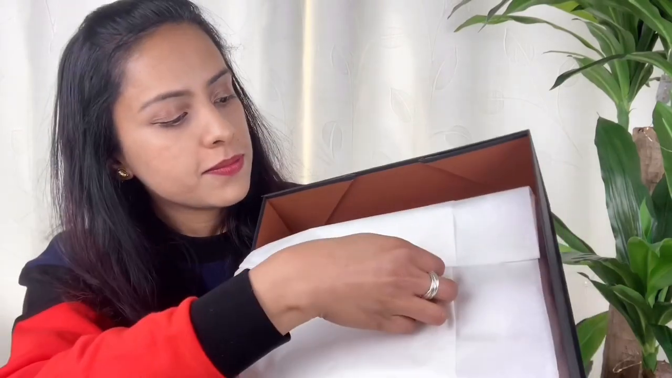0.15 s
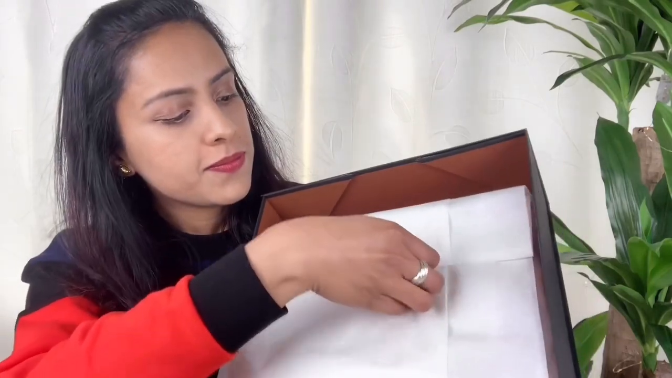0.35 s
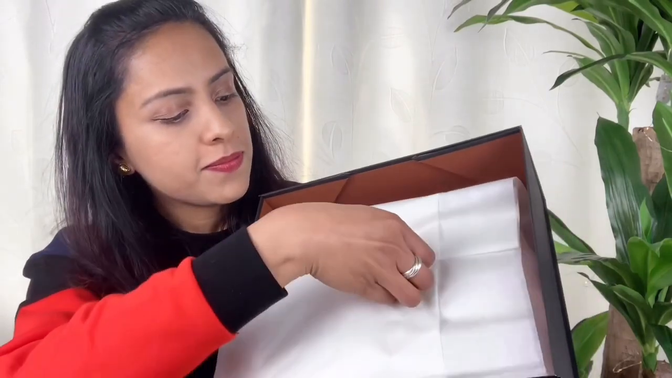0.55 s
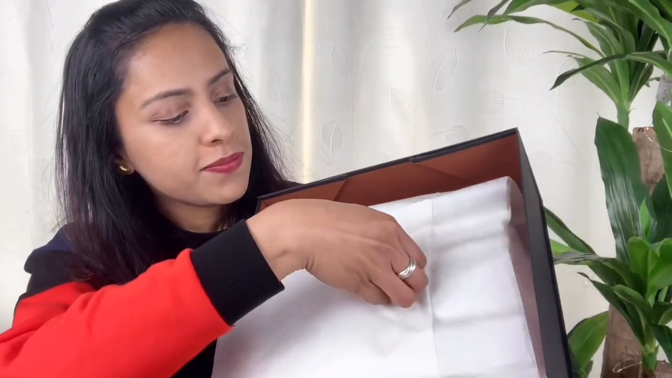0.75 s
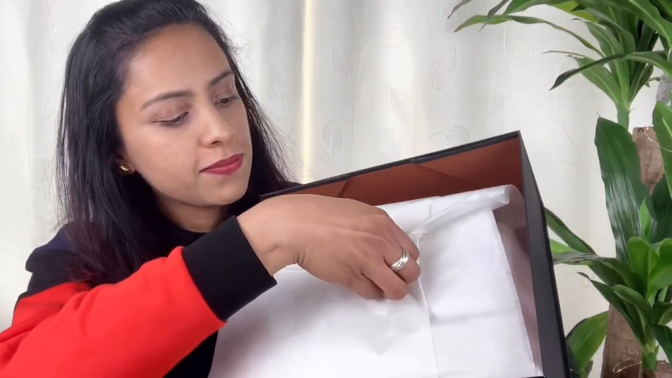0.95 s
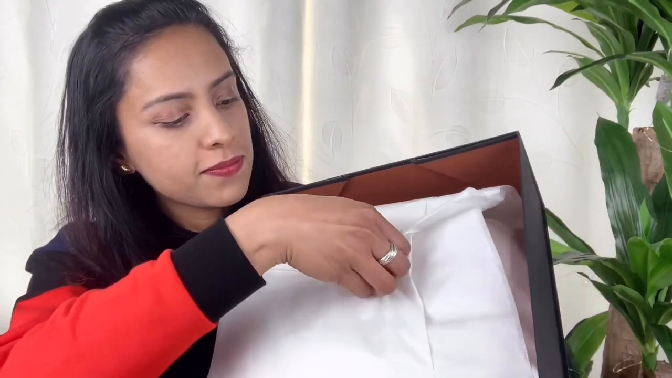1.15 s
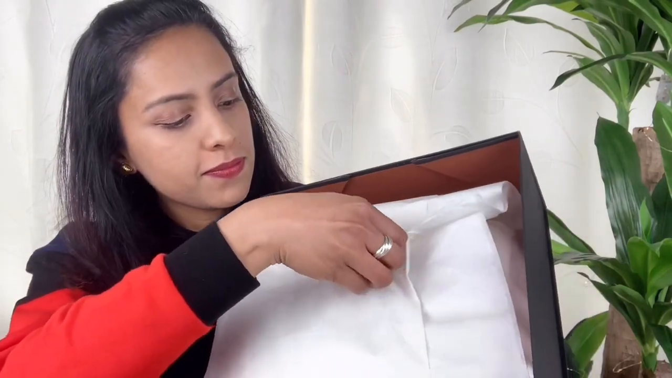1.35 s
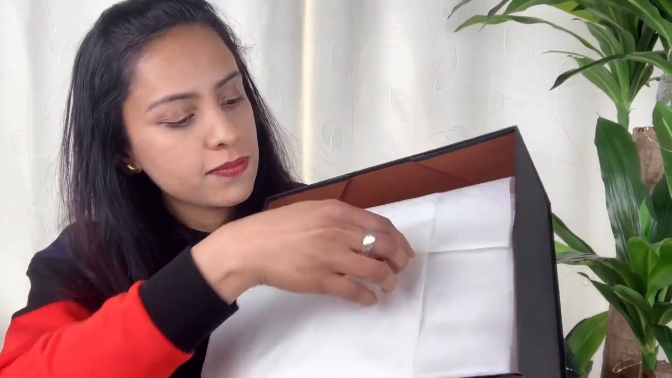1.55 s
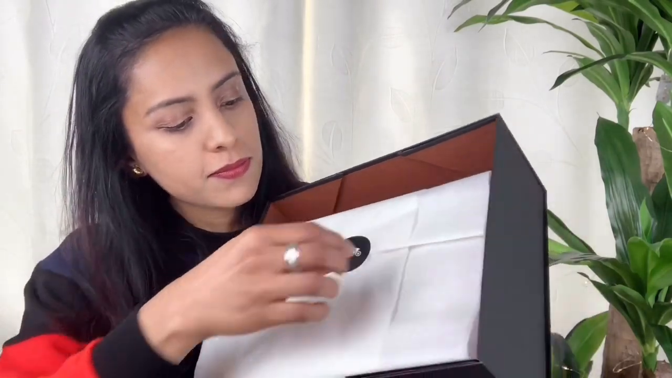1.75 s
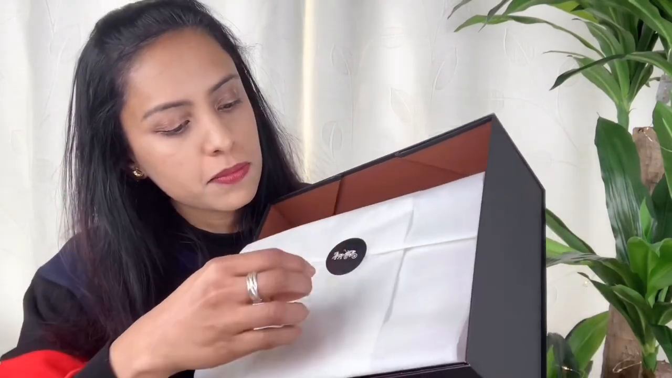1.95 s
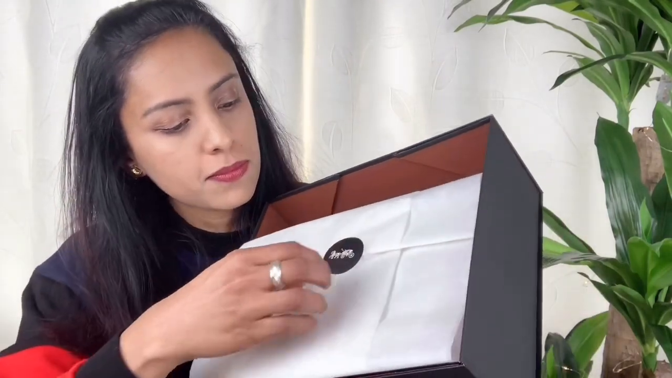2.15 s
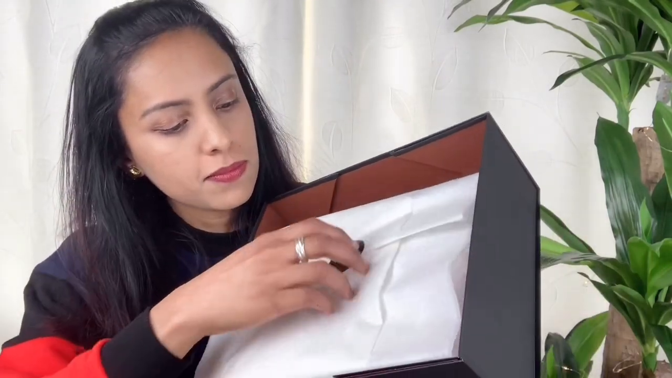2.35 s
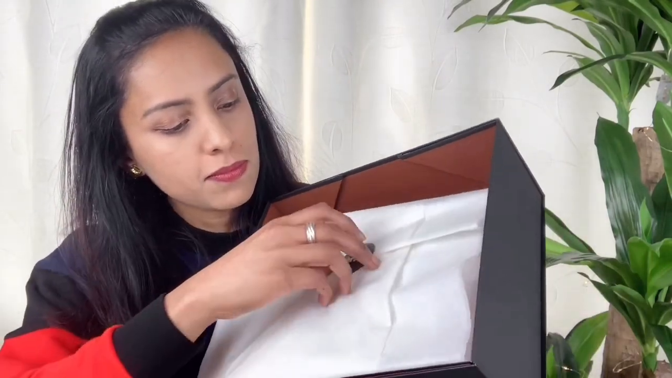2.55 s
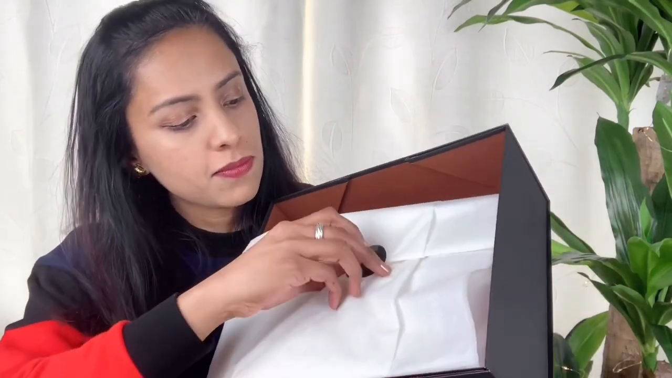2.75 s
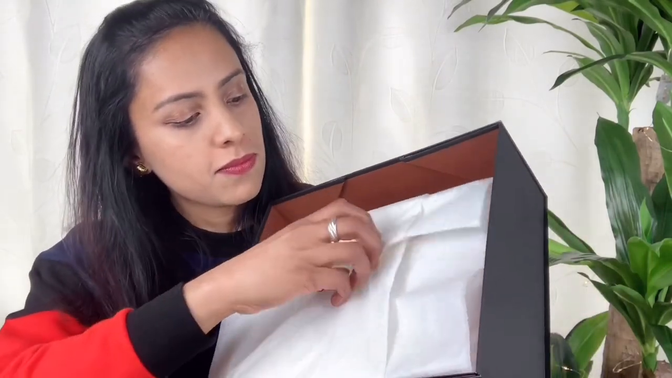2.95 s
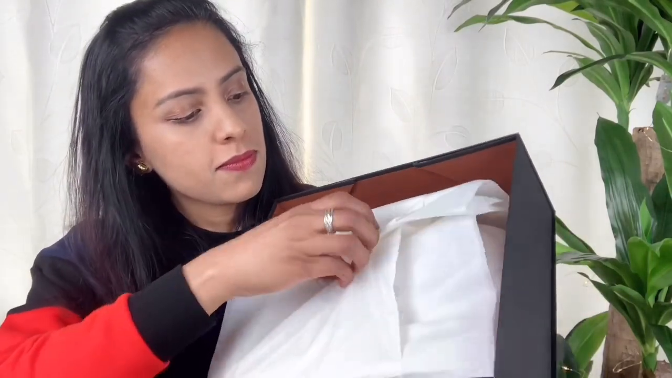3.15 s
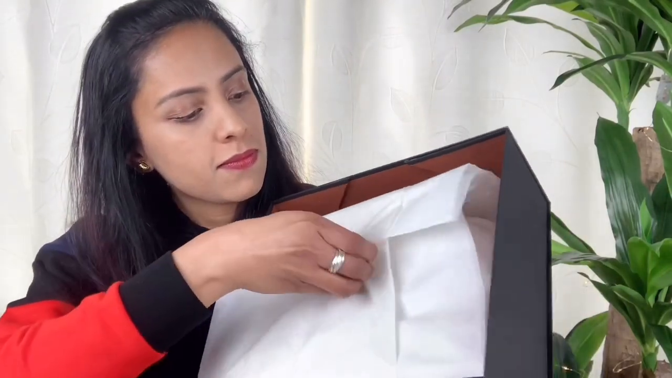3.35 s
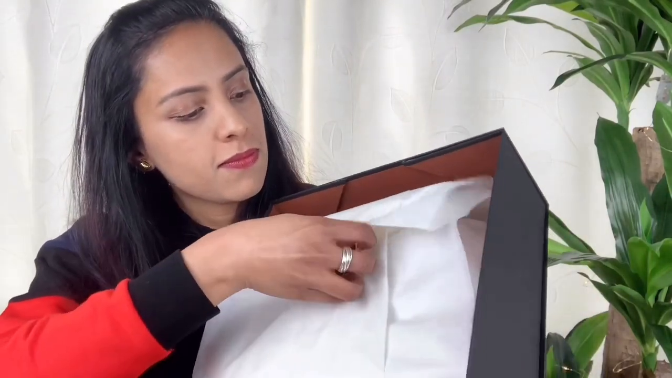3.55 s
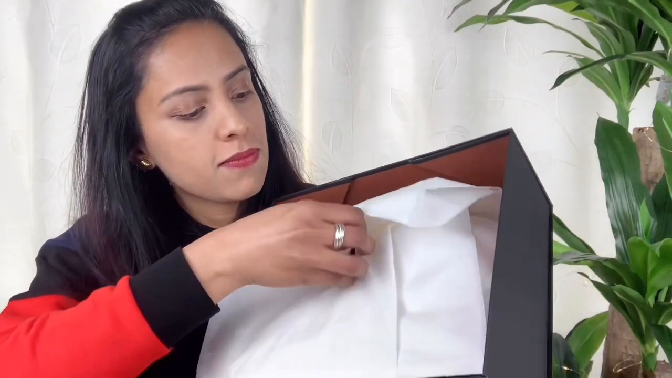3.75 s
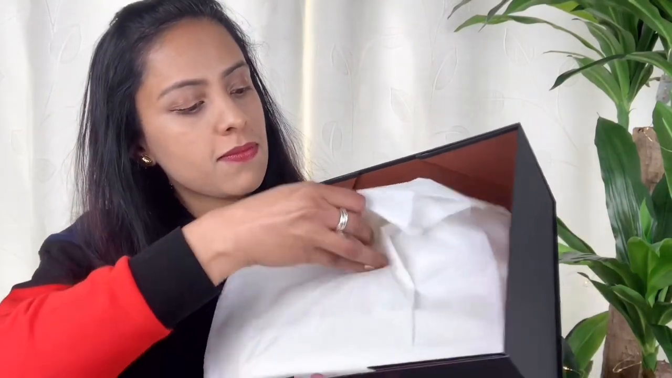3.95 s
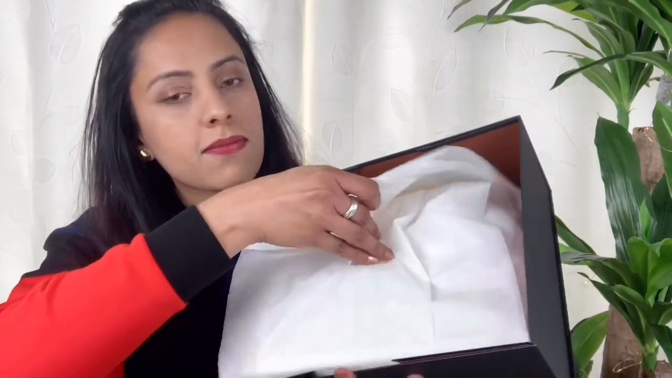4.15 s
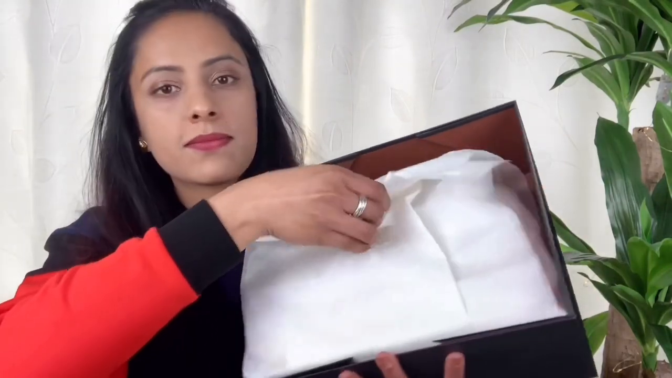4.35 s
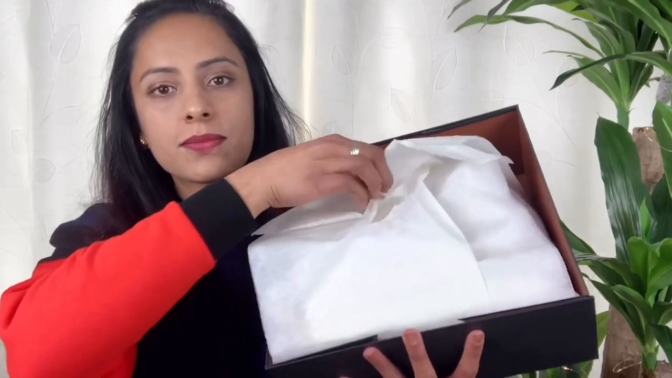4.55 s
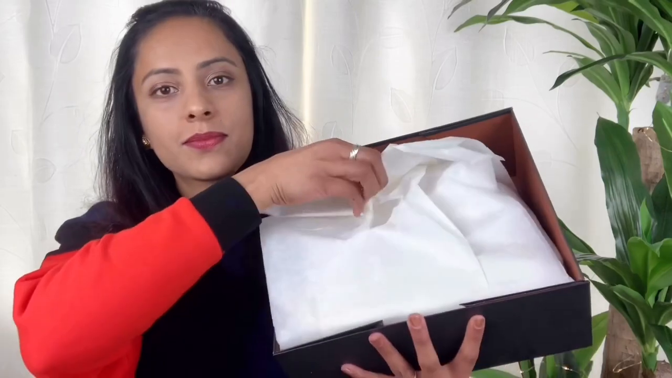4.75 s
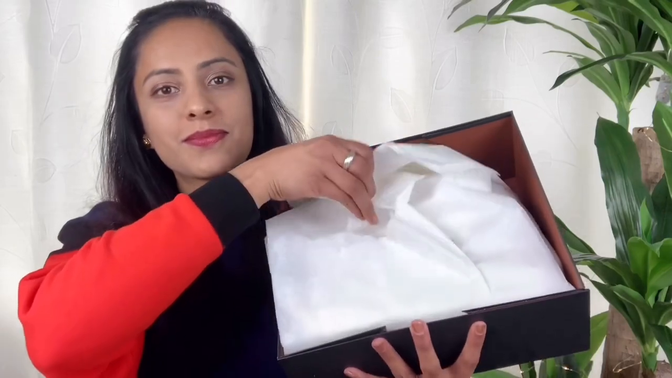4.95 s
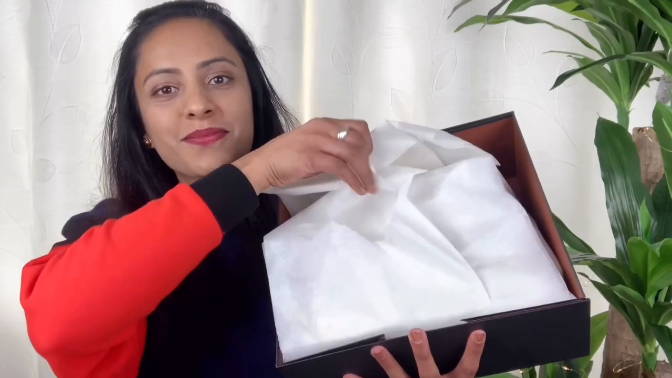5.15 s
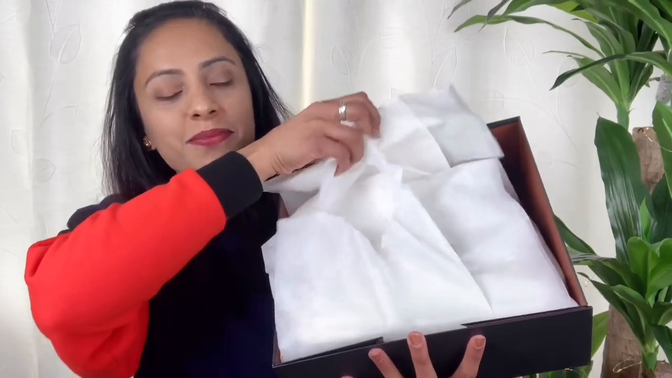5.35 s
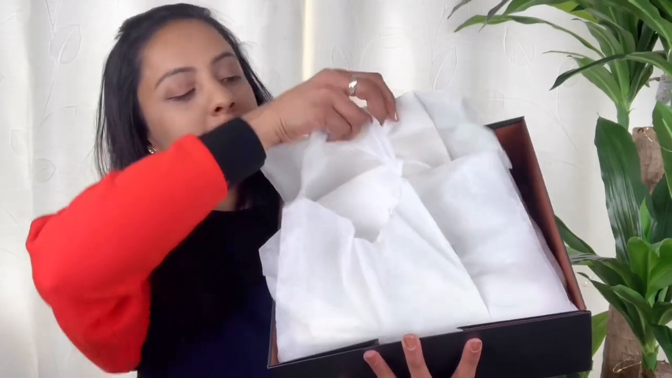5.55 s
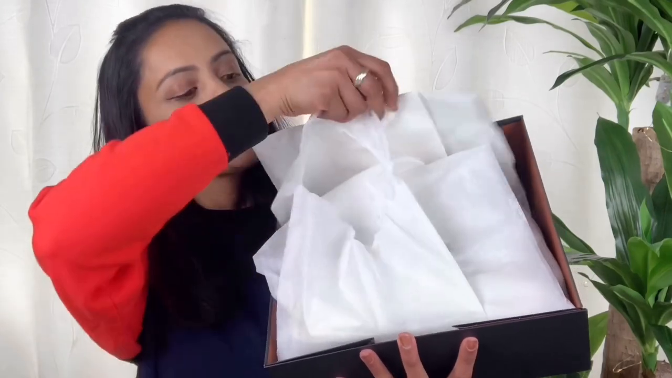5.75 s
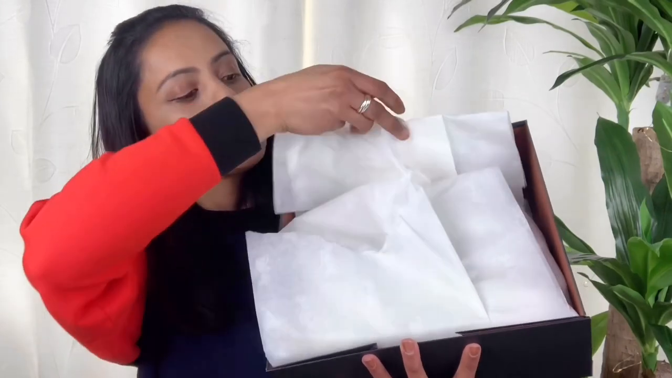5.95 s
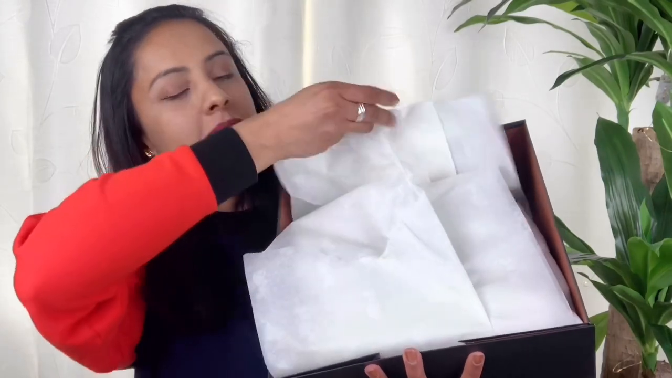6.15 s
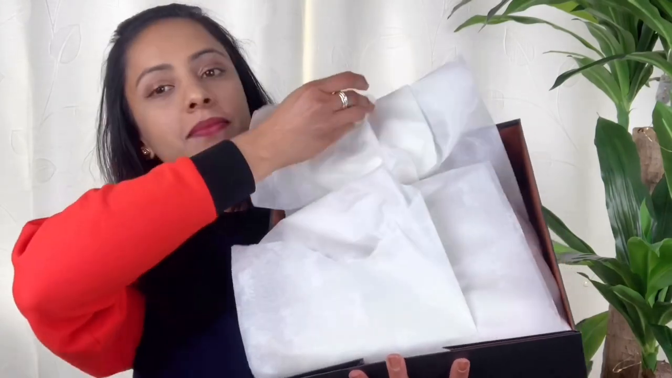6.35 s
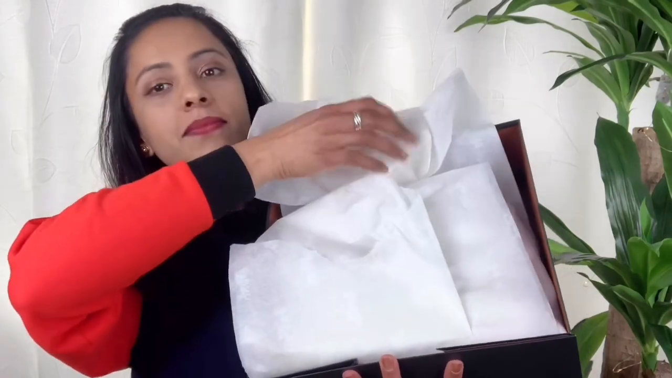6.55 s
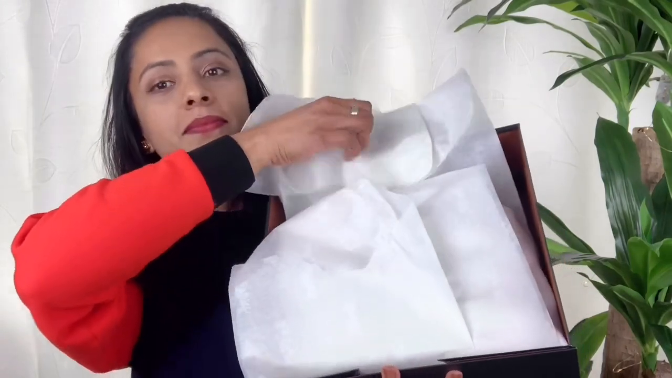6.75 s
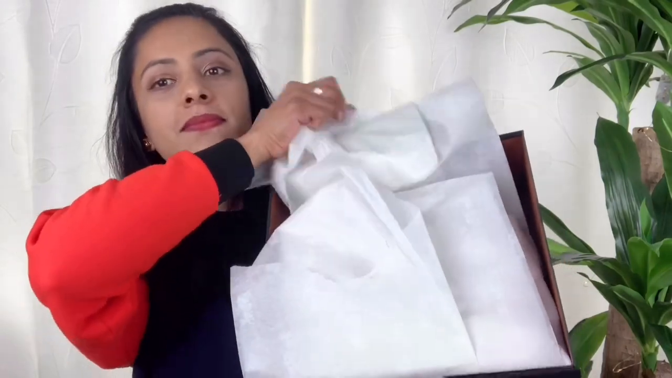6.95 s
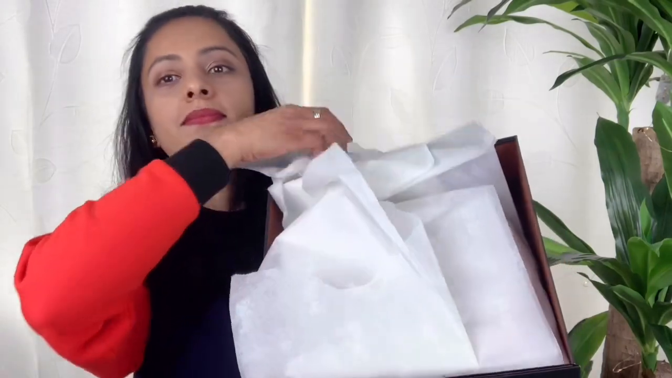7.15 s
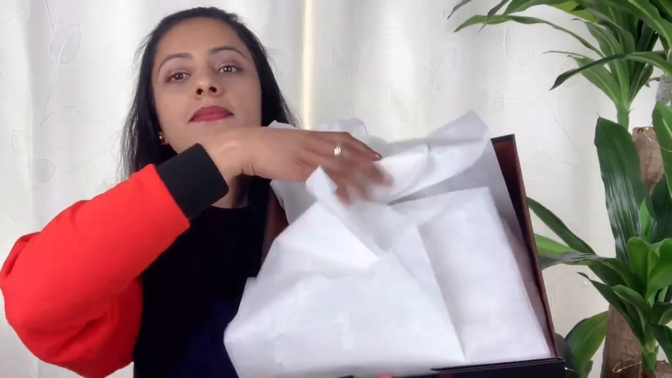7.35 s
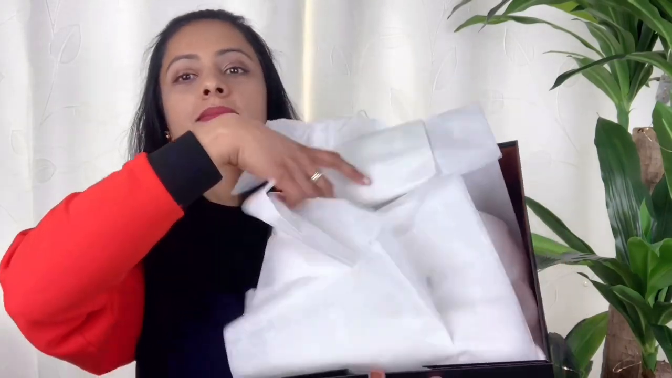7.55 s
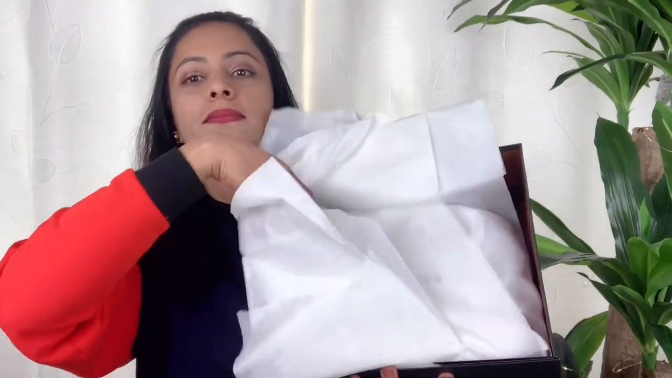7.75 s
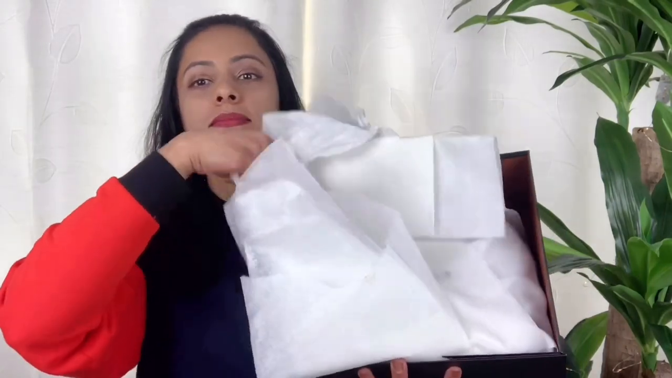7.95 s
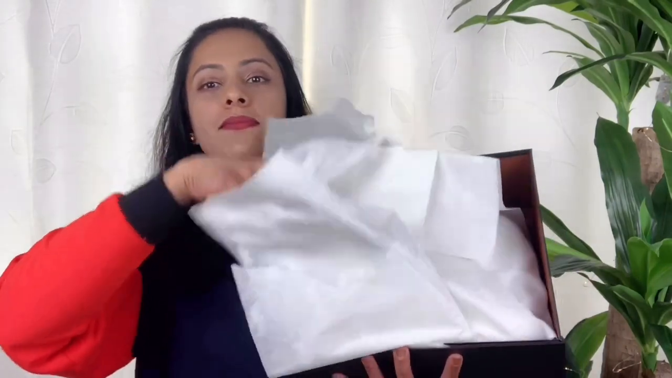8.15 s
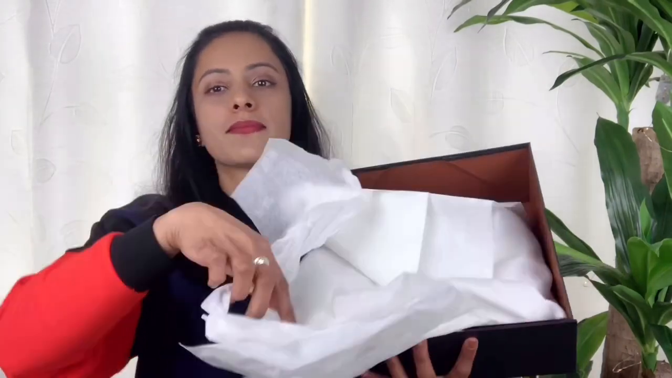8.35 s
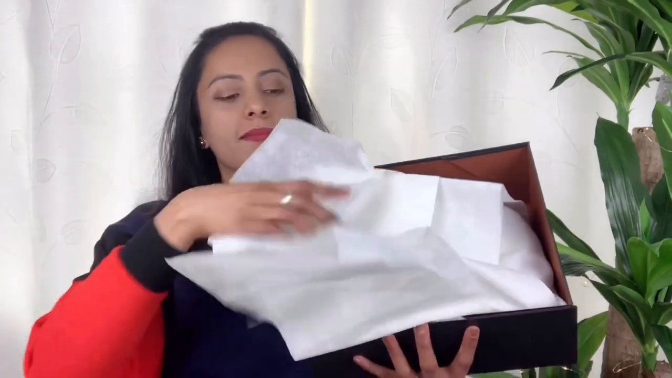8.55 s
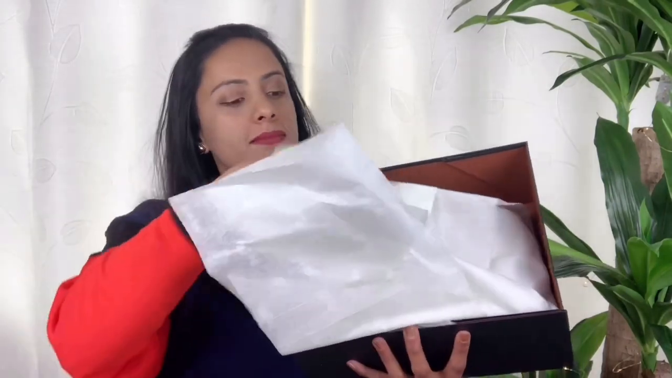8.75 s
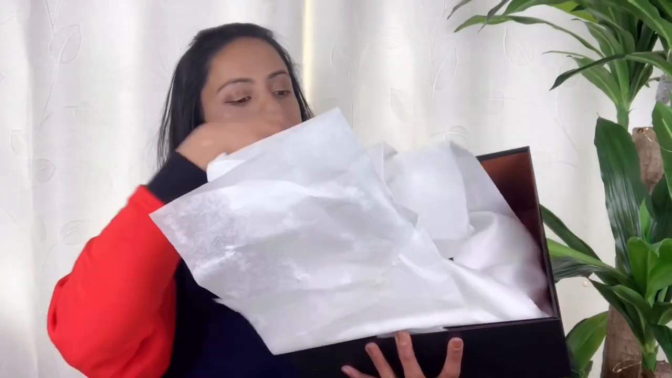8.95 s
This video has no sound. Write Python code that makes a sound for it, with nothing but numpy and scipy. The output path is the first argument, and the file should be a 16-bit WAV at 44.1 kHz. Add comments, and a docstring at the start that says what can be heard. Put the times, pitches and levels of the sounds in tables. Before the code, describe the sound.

Close, wide stereo sound of tissue paper in a cardboard box in a quiet, dry room. Fingers fidget faintly with small ticks and a near pause, then picking grows busier. A sharp crackle comes just before four seconds, building to dense bright crinkling around five. Afterwards longer, softer swishes of pulled sheets, with hollow little pops, thin out to quiet rustling.

```python
"""Tissue paper rustles as a hand pinches, unfolds and lifts sheets in a cardboard box, in a quiet room.
Countless tiny creases are coloured noise under bursts of power; larger ones snap and folds slip.
The box answers with a hollow body, sways in the bass and thuds; air pockets and bumped walls ring.
Left and right differ in phase and likeness by frequency, which gives the rustle width."""
import sys
import numpy as np
from scipy import signal
from scipy.io import wavfile
from scipy.ndimage import uniform_filter1d

SR = 44100
rng = np.random.default_rng(int(sys.argv[2]) if len(sys.argv) > 2 else 0)


def dump(signal):
    """Clip the signal to [-1, 1] and save it as 16-bit WAV at the path in sys.argv[1]."""
    limited = np.clip(np.atleast_2d(signal).T, -1, 1)
    pcm = np.round(limited * 32767).astype(np.int16)
    wavfile.write(sys.argv[1], SR, pcm)


N = 400869

# The fingers fidget on the sheet: [t/s, rustle level/dB, hollow of the box above the rustle/dB]
FIDGETS = [(0.0, -50.5, 1), (0.15, -65.5, -2), (0.33, -49, -1), (0.58, -56, -2.5), (0.66, -47, -2.5),
           (0.86, -55, 1), (1.0, -51.5, -4.5), (1.43, -51, -0.5), (1.57, -60.5, -6), (1.64, -84.5, 1.5),
           (2.13, -91, 3), (2.168, -50, 1), (2.38, -53, -3.5), (2.61, -46.5, -4), (2.81, -51, -1.5),
           (2.97, -47.5, -2.5), (3.01, -46, -4), (3.22, -49.5, -6.5), (3.33, -48.5, -1), (3.4, -51.5, -1),
           (3.53, -51.5, -1), (3.6, -46, 0.5), (3.74, -56, 5), (3.78, -47.5, 2), (4.0, -47.5, 3.5),
           (4.28, -50.5, -3), (4.45, -46, 2.5), (4.58, -50.5, -3), (4.72, -39, -4.5), (5.03, -61.5, 11),
           (5.42, -57, -7), (5.5, -40, -4.5), (5.66, -43, -12), (5.71, -41, -2), (5.76, -44.5, 0),
           (5.9, -42.5, 2.5), (6.0, -58, 10.5), (6.33, -43.5, 2.5), (6.5, -55, 5.5), (7.19, -51, -2),
           (7.6, -44.5, 5), (7.98, -47, -2), (8.33, -50.5, 0), (8.45, -52.5, -1.5), (8.62, -51.5, 1),
           (8.76, -49, 4.5), (9.09, -52, 0)]
# Creases that snap: [t/s, level/dB, bright half above dull half/dB]
SNAP_EVENTS = [(0.065, -41, 0), (0.178, -50, 2), (0.213, -57, -7), (0.216, -53, -10), (0.503, -45.5, -8),
               (0.554, -49.5, -7), (0.619, -42, 12), (0.6405, -30.5, -6), (0.763, -42, 5),
               (0.779, -37.5, -1), (0.909, -53, 3), (1.001, -37, 5), (1.0127, -38, -2), (1.023, -45, -1),
               (1.044, -45, 14), (1.061, -42, 10), (1.07, -40, 5), (1.0775, -37, -3), (1.084, -41, 8),
               (1.096, -41, 5), (1.115, -47, -8), (1.119, -50, -5), (1.14, -41, 2), (1.149, -43, -4),
               (1.215, -34, 9), (1.229, -45, 5), (1.256, -30, 9), (1.264, -39, 7), (1.287, -36, 2),
               (1.294, -41, -8), (1.309, -34.5, 4), (1.313, -47, 3), (1.529, -58, 3), (1.5515, -61, 3),
               (1.606, -63, -8), (1.7754, -67, 11), (1.857, -73, 0), (2.143, -64, -5), (2.166, -47, 14),
               (2.2426, -39, 5), (2.391, -43, 2), (2.442, -52, 10), (2.474, -52, 10), (2.48, -37, 11),
               (2.4845, -47, -8), (2.587, -39, 5), (2.732, -36, -6), (2.7835, -46, 13), (2.814, -48, -5),
               (2.832, -38.5, 18), (2.889, -39, 7), (3.116, -54, -6), (3.233, -43, 10), (3.273, -43.5, 20),
               (3.341, -45, 5), (3.373, -42, 16), (3.467, -42, 1), (3.5627, -39.5, 0), (3.648, -43, -5),
               (3.711, -37.5, 11), (3.7465, -43, 17), (3.7861, -41, 14), (3.846, -26, 20), (3.868, -24, 1),
               (3.877, -21.5, 2), (3.8935, -27, 11), (4.033, -47, -1), (4.114, -42, -10), (4.15, -40, 4),
               (4.2354, -49, 8), (4.288, -44, -14), (4.3136, -44, 16), (4.425, -37, -1), (4.462, -35, 15),
               (4.468, -26.5, 6), (4.474, -27.5, 1), (4.5018, -32, -4), (4.5227, -26.5, 5), (4.529, -28, 1),
               (4.538, -30, 9), (4.544, -30.5, 2), (4.566, -34, 6), (4.609, -32, 3), (4.613, -32, 3),
               (4.6354, -32.5, 6), (4.67, -28.5, 0), (4.672, -32, 8), (4.7118, -28.5, 7), (4.714, -42, 5),
               (4.72, -42, 5), (4.7655, -24.5, 10), (4.771, -36, 8), (4.781, -27, 10), (4.786, -26, 13),
               (4.803, -30, 4), (4.817, -30, 4), (4.9356, -26, 17), (5.048, -36, -7), (5.078, -30, 8),
               (5.1035, -28, 17), (5.14, -27, 14), (5.196, -20, 2), (5.201, -35, 6), (5.205, -27, 0),
               (5.213, -21, -2), (5.225, -21, 5), (5.2314, -21, 4), (5.248, -17, 3), (5.266, -30, 14),
               (5.276, -23, 4), (5.368, -30, -13), (5.4272, -38, 10), (5.431, -32, 16), (5.453, -29, 3),
               (5.472, -33, 14), (5.497, -28.5, 5), (5.51, -35, 0), (5.516, -33, 1), (5.539, -34, -7),
               (5.545, -31, -1), (5.559, -35, -6), (5.563, -34, -11), (5.57, -35, -5), (5.598, -32, -6),
               (5.603, -29, -6), (5.628, -31.5, -10), (5.641, -39, -6), (5.648, -37, -5), (5.682, -33, 0),
               (5.688, -33, -5), (5.692, -30, -3), (5.727, -28.5, -3), (5.731, -36, -6), (5.768, -34, 9),
               (5.9435, -43, -5), (5.957, -36, 6), (6.023, -34, 2), (6.0298, -30, 1), (6.077, -35, 13),
               (6.208, -33, -1), (6.306, -35, 17), (6.318, -41, -4), (6.555, -37, -9), (6.5736, -34, 9),
               (6.5945, -48, 9), (6.716, -31, 10), (7.009, -44, -10), (7.055, -48, -8), (7.21, -46, 15),
               (7.236, -39, -7), (7.514, -33, -2), (7.664, -34, 2), (7.70, -33, 0), (7.774, -26.5, 9),
               (8.175, -32.5, -10), (8.3366, -51, 2), (8.486, -37, 4), (8.499, -39, -2), (8.809, -46, 5),
               (8.861, -33, -7), (8.877, -39, -1), (8.91, -38, -3), (9.078, -42, -11)]
# A fold lets go at once and the sheet hisses on: [t/s, level/dB]
SLIP_EVENTS = [(0.0653, -56), (0.598, -51), (0.6394, -57), (0.902, -50), (1.2156, -51), (2.4798, -61),
               (2.832, -47), (3.8457, -34), (4.463, -37), (4.6084, -56), (4.667, -48), (4.782, -47),
               (5.0784, -41), (5.426, -37.5), (5.471, -35.5), (5.4979, -36.5), (5.558, -36), (5.5974, -50),
               (5.7264, -39), (7.0015, -45.5), (8.4846, -56)]
# A pocket of air between paper and cardboard pops: [t/s, peak level/dB, f/Hz]
POP_EVENTS = [(.642, -33, 1430), (1.023, -44, 1700), (1.061, -47, 1600), (1.071, -42, 1550),
              (1.078, -43, 1550), (1.097, -48, 1700), (1.114, -45, 915), (1.217, -40.5, 1720),
              (1.288, -36.5, 850), (1.289, -33, 2080), (3.125, -42, 1140), (3.15, -37, 1180),
              (3.17, -46, 1100), (3.615, -38, 1220), (4.463, -26, 1000), (4.473, -25, 1010),
              (4.645, -44, 1110), (5.232, -35, 1110), (5.437, -36, 1110), (5.477, -36, 1100),
              (5.599, -36, 1110), (5.629, -35, 1100), (5.69, -29, 1210), (6.03, -30.5, 980),
              (6.096, -34, 1070), (6.132, -24.5, 1030), (6.211, -28, 930), (7.852, -29, 1260),
              (8.61, -44, 1210), (8.76, -38, 1160)]
# The hand pulls the sheet along: [t/s at full strength, swell/s, hold/s, rustle level/dB,
# hollow of the box above the rustle/dB, sway of the box above the rustle/dB]
PULL_EVENTS = [(1.078, 0.045, 0.066, -56, 6, -4), (1.22, 0.015, 0.065, -51, -4, -6.5),
               (1.366, 0.046, 0.026, -49.5, -4.5, -20), (2.198, 0.041, 0.042, -49, -1.5, -18),
               (2.873, 0.066, 0.011, -39, -3, -17), (3.071, 0.065, 0.0083, -53, 5.5, -29),
               (3.137, 0.026, 0.022, -41.5, -3.5, -33), (3.858, 0.027, 0.078, -34, 2, -16),
               (4.502, 0.03, 0.023, -37.5, -7, -15), (4.807, 0.05, 0.17, -30.5, -3, -22.5),
               (5.121, 0.058, 0.077, -26, -6.5, -20), (5.286, 0.086, 0.09, -30, -4, -19),
               (5.43, 0.068, 0.015, -51, -1, 5.5), (5.54, 0.079, 0.037, -37, -3, -3.5),
               (5.638, 0.043, 0.013, -43.5, 6.5, -8), (5.683, 0.03, .005, -42, 1.5, -9),
               (5.74, 0.069, 0.033, -44.5, 7.5, -1), (6.109, 0.12, .11, -33, 0.5, -18.5),
               (6.632, 0.13, .32, -34, -2.5, -20.5), (7.059, 0.065, 0.033, -44.5, 3, -12),
               (7.331, 0.13, 0.19, -39.5, -1.5, -32), (7.514, 0.081, 0.03, -36, -2, -25),
               (7.68, 0.13, 0.018, -31.5, -2, -17), (7.771, 0.077, .12, -34, -5.5, -23),
               (8.102, 0.16, 0.16, -39.5, -2, -25), (8.497, 0.072, 0.043, -44.5, -0.5, -33),
               (8.869, 0.19, 0.12, -43, 3, -14.5)]
# Fingers bump the wall of the box: [t/s, peak level/dB, f/Hz]
BUMP_EVENTS = [(3.855, -48, 117), (4.644, -47, 135), (4.665, -42, 134), (4.827, -45, 230), (4.93, -39, 190),
               (5.271, -55, 197), (5.36, -40, 169), (5.555, -43, 160), (5.58, -43, 178), (5.722, -53, 189)]

# Colours of crisp sheet, hollow box, swaying box, fingertip scratch and room hush:
# [f/Hz, relative density level/dB]
SHEET_COLOUR = [(700, -59), (1500, -11.5), (2100, -4.5), (3100, 0.5), (4300, -2.5), (5100, 0), (5800, -1),
                (6600, -3), (8500, 1.5), (12300, 0), (14000, -1.5), (16000, -5)]
BOX_COLOUR = [(120, -40), (300, -10), (600, -5.5), (1050, -3.5), (1500, -4.5), (1850, -7), (2400, -9),
              (4000, -13)]
SWAY_COLOUR = [(30, -15), (60, -3.5), (110, -5.5), (190, 1.5), (300, -6.5), (600, -20.5)]
SCRATCH_COLOUR = [(1400, -33), (2400, -10), (4200, -11.5), (6000, 3.5), (7200, 7), (10000, -50)]
ROOM_COLOUR = [(15, -32), (25, -5.5), (55, 5), (117, 0), (714, -25), (818, -24), (2000, -31), (8590, -39),
               (12500, -60), (16000, -56)]

# Phase between the channels: [f/Hz, left ahead of right/half-turns]
CHANNEL_PHASE = [(60, 0), (900, -.1), (2700, -.55), (3600, -.45), (4100, -.55), (4600, -1), (6350, -1),
                 (6850, 0), (8000, 0), (9000, 1), (9900, 1), (10900, 2), (11800, 2), (12700, 3), (13700, 3),
                 (14500, 4), (16500, 4)]
# Usual likeness of the channels, before the loss near a quarter turn: [f/Hz, likeness 0..1]
CHANNEL_LIKENESS = [(60, .92), (200, .96), (700, .78), (1100, .9), (2200, .6), (3200, .6), (4300, .4),
                    (6300, .7), (7500, .93), (9400, .99), (16000, .995)]
# Balance of the channels: [f/Hz, left above right/dB]
CHANNEL_LEAN = [(60, 1), (180, 0.5), (550, -1.5), (1650, -1.5), (4970, -1), (9000, 2), (15000, -1.5)]
# The band near 5.5 kHz where left and right oppose varies over time:
# [t/s, likeness there before the loss near a quarter turn 0..1, upper edge f/Hz]
OPPOSED_BAND = [(0, 0.31, 5960), (1.5, 0.49, 6100), (2.2, 0.48, 6300), (3.8, .5, 6300), (3.9, 0.51, 6440),
                (4.0, 0.54, 6300), (4.7, 0.31, 6200), (4.8, .99, 6360), (4.97, .99, 6250),
                (5.05, 0.45, 6700), (5.15, 0.8, 6700), (5.4, 0.87, 7100), (5.5, 0.9, 6830),
                (5.88, .95, 6600), (5.95, .4, 6300), (6.5, 0.67, 6340), (6.63, 0.97, 6300), (6.9, 1, 6200),
                (7.0, 0.41, 6400), (9.09, 0.28, 6400)]

SWELL_DB, LET_GO_DB_PER_S = 20, 272  # a pull's growth over its swell, and its fall after the hold
FIDGET_SWAY_DB = -15.5  # sway of the box above the fidgeting rustle
SWAY_LUMPS_DB, SWAY_LUMP_S = 4, 0.15  # the sway comes in lumps
SNAP_T60_S, SNAP_SPREAD = 0.0091, 0.2  # typical decay of a snap, and its log spread
CLICK_DB, KNOCK_DB = 2, -1.5  # click above its snap, and that click's knock in the box
THUD_DB, THUD_T60_S = -7, 0.039  # main part of a snap's thud in the box
SLIP_RISE_S, SLIP_T60_S, SLIP_HOLLOW_DB = 0.002, 0.13, 3
TAPS_DB, SCRATCH_DB, ROOM_DB = -10.5, -11.5, -72
SPLIT_HZ = 8000  # between the dull and the bright half of the sheet
OPPOSED_HZ, OPPOSED_WIDTH_HZ, USUAL_EDGE_HZ = 5500, 900, 6600
BAND_LIMIT_HZ = 15850


def gain_of(db):
    """Decibels to an amplitude factor; twice the decibels give the power factor."""
    return 10 ** (np.asarray(db) / 20)


def evened(x):
    """Scales to rms 1."""
    return x / np.sqrt(np.mean(x ** 2) + 1e-20)


def smoothed(x, span, axis=-1):
    """Two running means in a row."""
    return uniform_filter1d(uniform_filter1d(x, span, axis), span, axis)


def lumps(length_s):
    """Slow random wander at rms 1."""
    return evened(smoothed(rng.standard_normal(N), round(length_s * SR)))


def read(points, hz):
    """Straight lines between points on a log-frequency axis."""
    f, value = np.transpose(points)
    return np.interp(np.log(hz + 1), np.log(f + 1), value)


def coloured(x, colour):
    """Causal minimum-phase filter of the given colour that leaves white noise at rms 1."""
    level_db = np.maximum(read(colour, abs(np.fft.fftfreq(8192, 1 / SR))), -100)
    log_gain = np.log(gain_of(level_db))
    # the Hilbert transform of the log gain supplies the phase
    taps = np.fft.ifft(np.exp(np.conj(signal.hilbert(log_gain)))).real[:4096]
    return signal.oaconvolve(x, taps[None] / np.linalg.norm(taps), axes=1)[:, :N]


def add(track, s, shape):
    """Lays one shape onto a track."""
    part = track[round(s * SR):][:len(shape)]
    part += shape[:len(part)]


def burst(rise_s, t60):
    """Power shape of one crease: quick rise to 1, exponential fall, cut after an eighth of a second."""
    t = np.arange(SR // 8) / SR
    shape = (1 - np.exp(-t / rise_s)) ** 2 * gain_of(-120 * t / t60)
    return shape / shape.max()


def creases(per_s, spread_db, clump_db, clump_s):
    """Random buckling, mostly tiny, now and then large, in clumps of size: power per sample."""
    size_db = spread_db * np.minimum(rng.exponential(1, N), 4.2) + clump_db * lumps(clump_s)
    return gain_of(2 * size_db) * (rng.random(N) < per_s / SR)


def smeared(power, shape):
    """Gives every crease its rise and fall; mean power 1."""
    out = abs(signal.oaconvolve(power, shape)[:N])
    return out / out.mean()


def drifting(x, patchy_db, wide_bins, long_frames):
    """The colour wanders in patches as the crumpled sheet turns its faces."""
    z = signal.stft(x, nperseg=512, noverlap=384)[2]
    patches = rng.standard_normal(z.shape[1:])
    patches = evened(smoothed(smoothed(patches, wide_bins, 0), long_frames, 1))
    moved = z * gain_of(patchy_db * patches)
    return evened(signal.istft(moved, nperseg=512, noverlap=384)[1][:, :N])


def rings(events, cycles):
    """Each event is a decaying tone, in quadrature between channels, losing 60 dB in so many cycles."""
    out, t = np.zeros((2, N)), np.arange(SR // 8) / SR
    for at, peak_db, hz in events:
        fade = gain_of(peak_db) * np.sqrt(burst(.5 / hz, cycles / hz))
        add(out[0], at, fade * np.sin(2 * np.pi * hz * t))
        add(out[1], at, fade * np.cos(2 * np.pi * hz * t))
    return out


def fidgeting():
    """Restless fingers: slowly changing power of rustle, hollow and sway."""
    t = np.arange(N) / SR
    s, rustle_db, hollow_db = np.transpose(FIDGETS)
    above_db = np.array([0 * t, np.interp(t, s, hollow_db), FIDGET_SWAY_DB + 0 * t])
    return gain_of(2 * (np.interp(t, s, rustle_db) + above_db))


def room():
    """The faint hush of the room: steady coloured noise."""
    return gain_of(ROOM_DB) * coloured(rng.standard_normal((2, N)), ROOM_COLOUR)


def snaps():
    """Large creases snap: power of dull half, bright half and box thud, plus one sharp click each."""
    dull, bright, thuds, clicks = np.zeros((4, N))
    thud = burst(0.00049, THUD_T60_S) + gain_of(-23.0) * burst(0.0038, 0.072)
    thud *= gain_of(2 * THUD_DB)
    for at, level_db, bright_db in SNAP_EVENTS:
        t60 = SNAP_T60_S * np.exp(SNAP_SPREAD * rng.standard_normal())
        snap = burst(t60 / 10, t60) + gain_of(-34) * burst(.003, .08)  # with a weak tail
        dull_power = gain_of(2 * level_db - bright_db)
        add(dull, at, dull_power * snap)
        add(bright, at, gain_of(2 * level_db + bright_db) * snap)
        add(thuds, at, dull_power * thud)
        add(clicks, at + t60 / 10, gain_of([level_db + CLICK_DB]))
    return dull, bright, thuds, clicks


def slips():
    """Folds let go at once: power that jumps up and hisses away."""
    power = np.zeros(N)
    for at, level_db in SLIP_EVENTS:
        add(power, at, gain_of(2 * level_db) * burst(SLIP_RISE_S, SLIP_T60_S))
    return power


def pops():
    """Air pockets between paper and cardboard ring briefly."""
    return rings(POP_EVENTS, cycles=17)


def pulls():
    """Drawing the sheet along swells, holds and lets go: power of rustle, hollow and sway."""
    t, power = np.arange(N) / SR, np.zeros((3, N))
    for at, swell_s, hold_s, level_db, hollow_db, sway_db in PULL_EVENTS:
        near = slice(max(round((at - 1) * SR), 0), round((at + 1) * SR))
        since = t[near] - at
        swell_db = SWELL_DB * np.minimum(since, 0) / swell_s
        fall_db = LET_GO_DB_PER_S * np.maximum(since - hold_s, 0)
        above_db = np.array([[0], [hollow_db], [sway_db]])
        power[:, near] += gain_of(2 * (above_db + level_db + swell_db - fall_db))
    return power


def bumps():
    """Fingers bump the wall of the box, which rings low and short."""
    return rings(BUMP_EVENTS, cycles=10.5)


def paper():
    """Noise under the power of all creases: crisp from the sheet, slower and rounder from the box."""
    fidget = fidgeting()
    rustle, hollow, sway = fidget + pulls()
    sway = sway * gain_of(2 * SWAY_LUMPS_DB * lumps(SWAY_LUMP_S))
    slip = slips()
    snap_dull, snap_bright, thuds, clicks = snaps()

    small = creases(per_s=2000, spread_db=2.4, clump_db=1.3, clump_s=.012)
    taps = creases(per_s=300, spread_db=3.0, clump_db=2.5, clump_s=.02)
    tilt = gain_of(0.48 * rng.standard_normal(N))  # each crease is brighter or duller
    crisp = burst(.0003, .008) + gain_of(-38) * burst(.003, .09)
    rounded = burst(0.0016, 0.02) + gain_of(-17) * burst(0.013, 0.2)

    dull = (rustle + slip) * smeared(small / tilt, crisp) + snap_dull
    bright = (rustle + slip) * smeared(small * tilt, crisp) + snap_bright
    # fingertips alone add a fine scratch
    scratch = gain_of(2 * SCRATCH_DB) * fidget[0] * smeared(small, crisp)
    # scattered folds tick against the cardboard
    ticks = gain_of(2 * TAPS_DB) * hollow * smeared(taps, burst(0.00036, .012))
    body = (hollow + gain_of(2 * SLIP_HOLLOW_DB) * slip) * smeared(small / tilt, rounded)
    box = ticks + body + thuds

    noise = drifting(rng.standard_normal((4, N)), patchy_db=3.0, wide_bins=2, long_frames=15)
    dull_noise = np.sqrt(dull) * noise[:2]
    bright_noise = np.sqrt(bright) * noise[:2]
    # dull power below the split, bright power above it
    split = signal.butter(4, SPLIT_HZ, fs=SR, output="sos")
    sheet = bright_noise + signal.sosfiltfilt(split, dull_noise - bright_noise) + clicks
    box_noise = np.sqrt(box) * noise[2:] + gain_of(KNOCK_DB) * clicks
    sway_noise = np.sqrt(sway) * rng.standard_normal((2, N))
    scratch_noise = np.sqrt(scratch) * noise[2:]
    return (coloured(sheet, SHEET_COLOUR) + coloured(box_noise, BOX_COLOUR)
            + coloured(sway_noise, SWAY_COLOUR) + coloured(scratch_noise, SCRATCH_COLOUR))


def scene():
    """Two-channel sum: paper and box, pops, bumps and the room."""
    return paper() + pops() + bumps() + room()


def record(dry):
    """The right channel is the left one shifted in phase, plus a share of its own; band limited."""
    hz, t, (first, second) = signal.stft(dry, SR, nperseg=1024, noverlap=768)
    hz = hz[:, None]
    s, alike, edge_hz = np.transpose(OPPOSED_BAND)
    alike = np.clip(np.interp(t, s, alike), 0, 1)
    # moving the band's edge slides the phase curve around it
    shift = USUAL_EDGE_HZ - np.interp(t, s, edge_hz)
    phase_hz = hz + shift * np.exp(-((hz - USUAL_EDGE_HZ) / 1500) ** 2)
    phase = np.pi * read(CHANNEL_PHASE, phase_hz)

    inside = np.exp(-((hz - OPPOSED_HZ) / OPPOSED_WIDTH_HZ) ** 4)
    same = inside * alike + (1 - inside) * read(CHANNEL_LIKENESS, hz)
    # above 5 kHz the channels are less alike where their phase is near a quarter turn
    same = np.clip(same * (1 - .55 * (hz > 5000) * np.sin(phase) ** 2), 0, 1)

    right = same * np.exp(-1j * phase) * first + np.sqrt(1 - same ** 2) * second
    lean = gain_of(read(CHANNEL_LEAN, hz) / 2)  # half the balance on each channel
    stereo = np.array([first * lean, right / lean])
    stereo = signal.istft(stereo, SR, nperseg=1024, noverlap=768)[1][:, :N]
    low_pass = signal.firwin(511, BAND_LIMIT_HZ, window=("kaiser", 9), fs=SR)
    return signal.oaconvolve(stereo, low_pass[None], "same")


dry = scene()
out = record(dry)
dump(out)
```